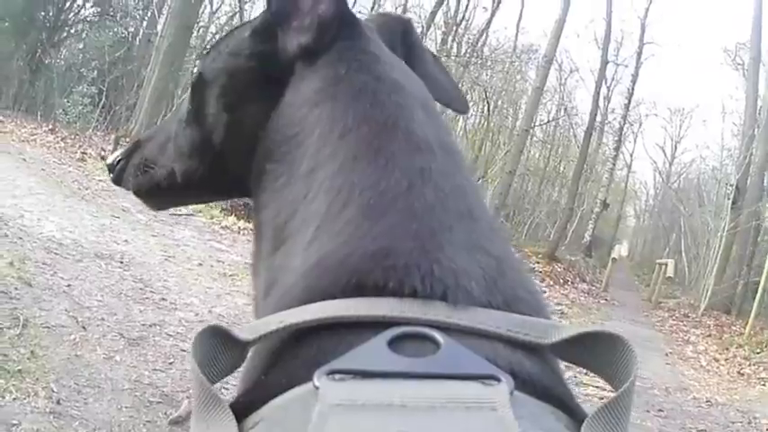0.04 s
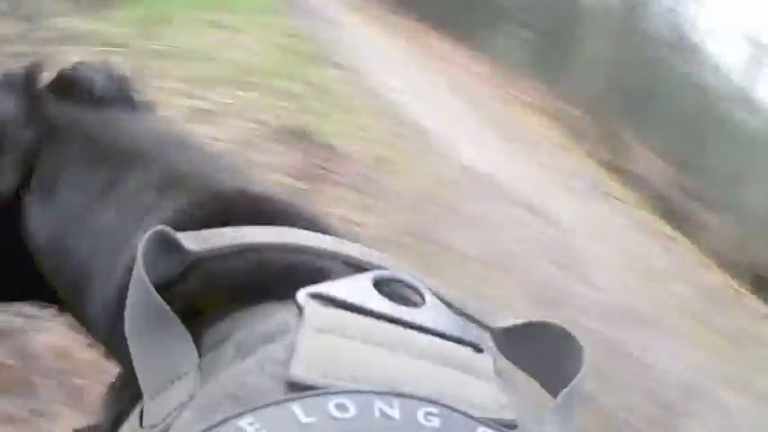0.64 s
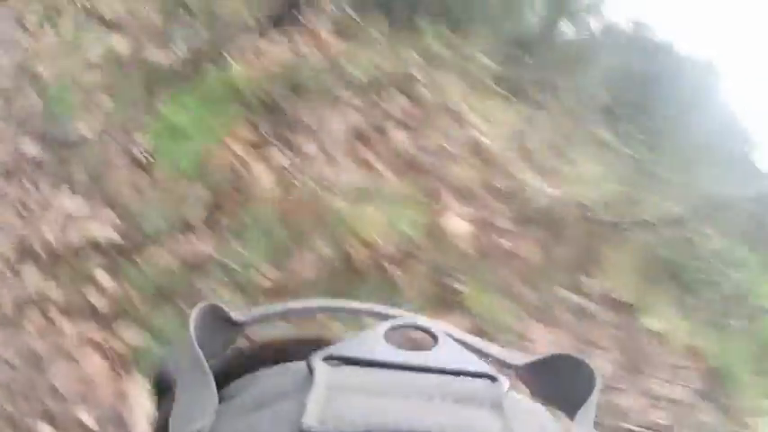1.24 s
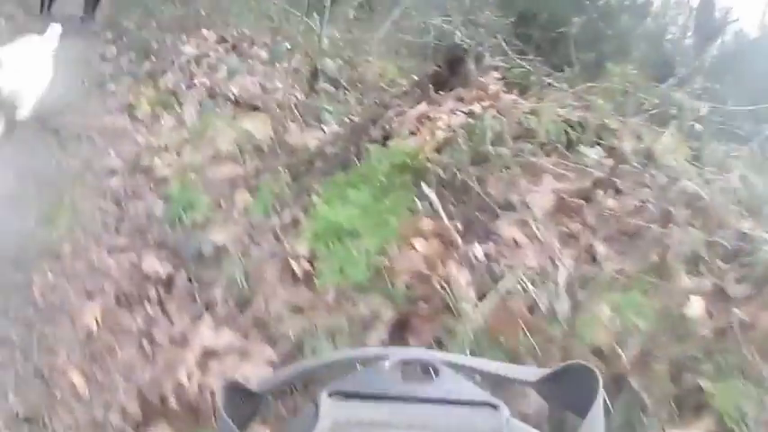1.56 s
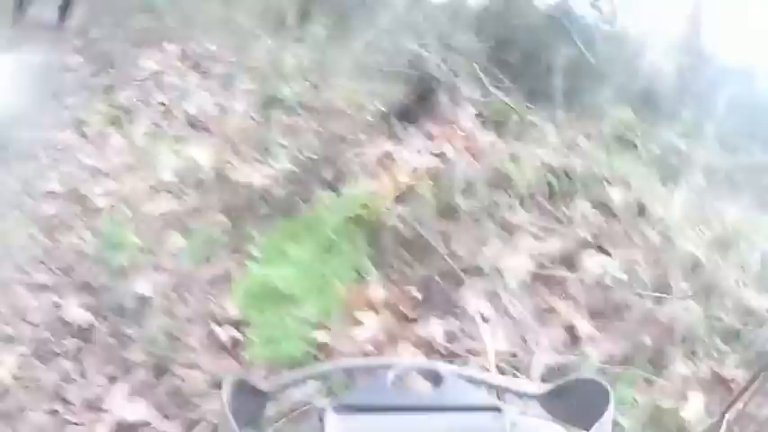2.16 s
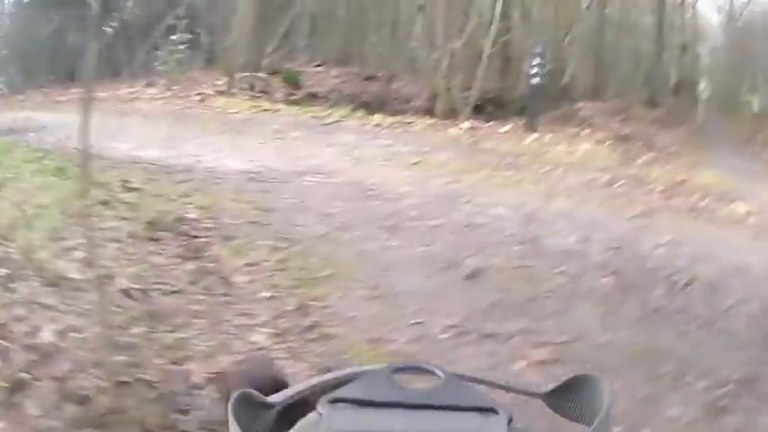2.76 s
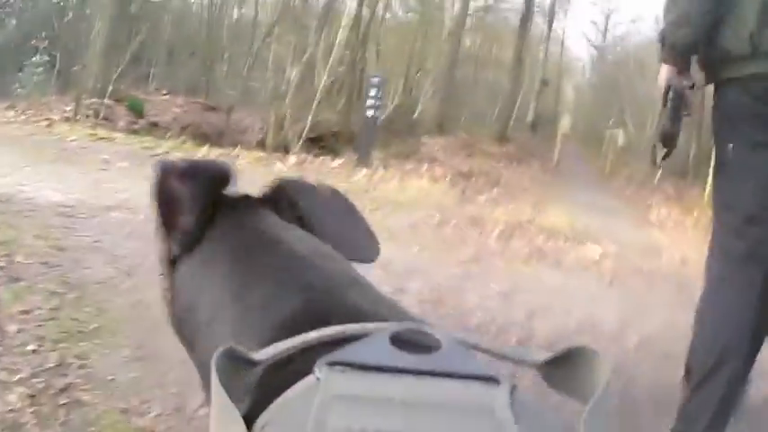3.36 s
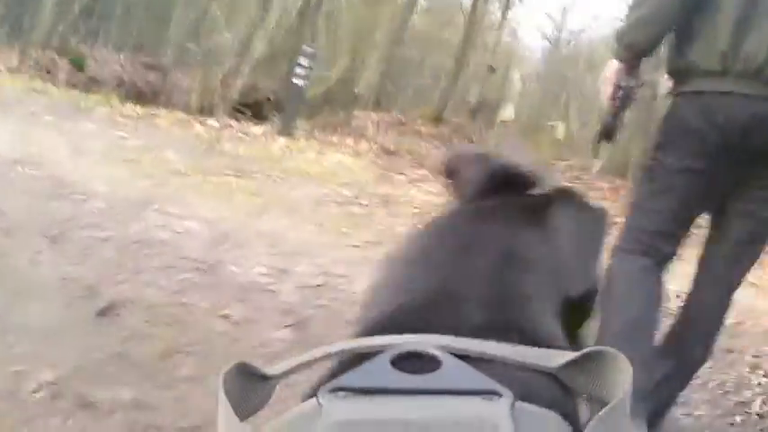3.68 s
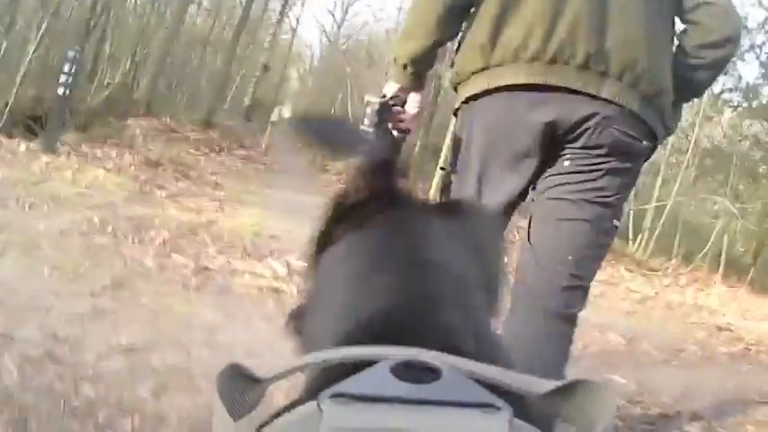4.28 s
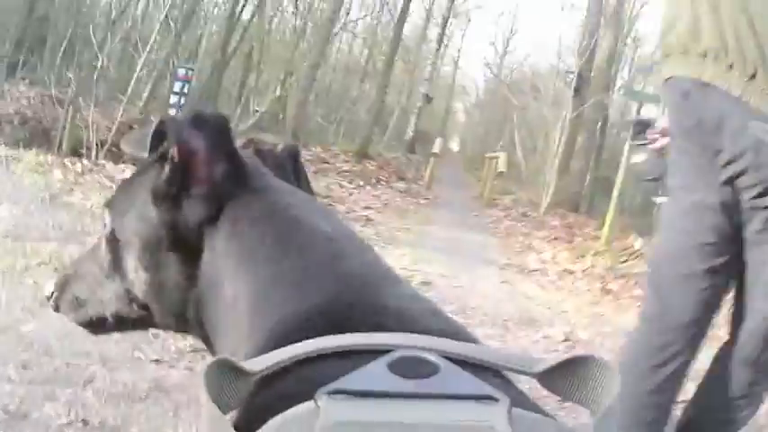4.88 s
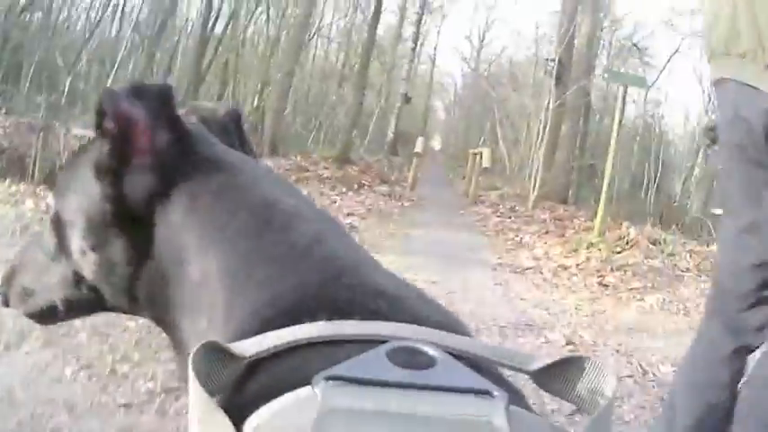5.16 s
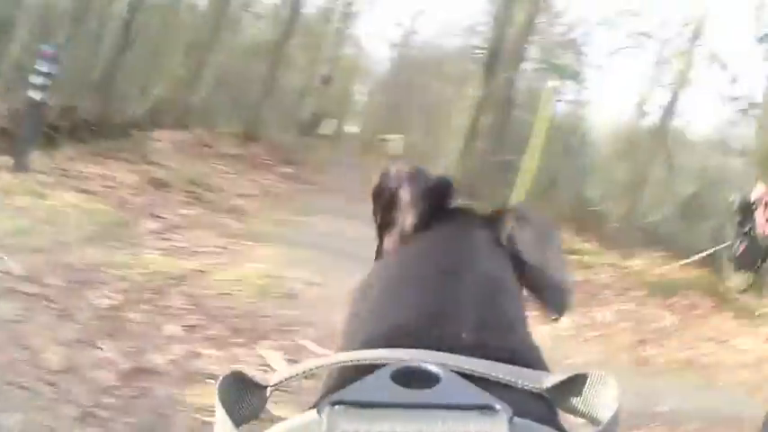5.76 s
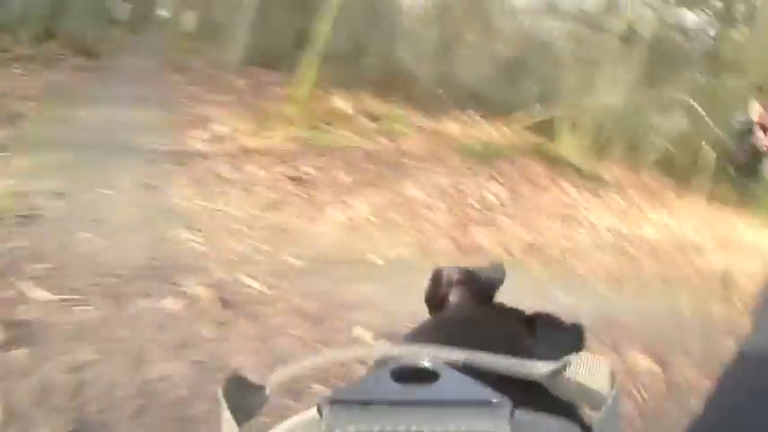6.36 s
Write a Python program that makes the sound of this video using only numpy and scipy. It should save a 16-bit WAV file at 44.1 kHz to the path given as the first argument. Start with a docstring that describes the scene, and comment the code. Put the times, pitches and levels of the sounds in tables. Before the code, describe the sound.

Close handling noise from a camera strapped to a dog moving along a forest path. A low swaying rumble and faint hiss give way to rubbing webbing and one sharp, hard knock of the plastic case. More rattling builds to another loud clatter, after which a thin, faint whine sputters. The harness then keeps bumping softly on the dog's coat, with irregular lighter knocks and strap scrapes.

```python
"""A woodland path, heard from a trotting dog's back: the microphone is in a small plastic-cased camera
on the harness. From the start there is a faint hiss, the camera sways and its pad rumbles on the coat.
The straps begin to rub and creak; at half a second the pad bumps and the loose mount knocks hard,
ringing the case and cracking grit. Near 1.5 s comes another loud clatter, then a faint whine sputters.
Lighter knocks, bumps and scrapes carry on to the end, all right against the microphone."""
import sys
import numpy as np
from scipy import signal
from scipy.fft import rfft, irfft
from scipy.io import wavfile
from scipy.ndimage import uniform_filter1d

SR = 44100
rng = np.random.default_rng(int(sys.argv[2]) if len(sys.argv) > 2 else 0)


def master_out(mix):
    """Clip the mix to full scale and print it as 16-bit PCM to the path in sys.argv[1]."""
    frames = np.transpose(np.atleast_2d(mix))
    ceiling = np.clip(frames, -1, 1)
    pcm = np.round(ceiling * 32767).astype(np.int16)
    wavfile.write(sys.argv[1], SR, pcm)


N = 287532
TIME = np.arange(N) / SR

# colours of the hiss, the camera's sway and the shifting pad: f/Hz, relative level/dB
HISS_SPECTRUM = [(30, 14.5), (300, 11), (1200, -0.5), (3000, -1), (6000, -4), (9000, -3.5), (12000, -4.5),
                 (14000, -8.5), (15500, -16.5)]
SWAY_SPECTRUM = [(5, -18), (13, 2.5), (22, -8), (32, -12.5), (42, -16.5), (56, -18), (90, -47), (200, -86)]
PAD_SPECTRUM = [(35, -24.5), (60, -16), (95, -2.5), (130, 3.5), (175, -8), (240, -17.5), (340, -44),
                (700, -70)]
# ever-present tones of the electronics: f/Hz, level/dB, flutter depth/Hz
IDLE_TONES = [(7280, -84, 25), (9200, -83, 130)]
# rise and fall of the whine: t/s, level/dB
WHINE_LEVELS = [(0, -100), (.8, -82), (1.25, -70.5), (1.7, -74), (2.4, -77.5), (2.55, -78), (3.05, -74),
                (3.9, -82), (4.5, -80), (4.75, -101), (5.3, -91), (5.75, -79), (6.52, -69)]
# tones of the whine: f/Hz, relative level/dB, flutter depth/Hz
WHINE_PARTIALS = [(10149, -2, 25), (11790, -9, 70)]
# how far the dog's back swings the camera: t/s, level before trim/dB
BACK_SWING = [(0.0, -54), (0.54, -38.5), (2.03, -33.5), (2.12, -60.5), (2.18, -33), (2.89, -52.5),
              (2.92, -39), (3.23, -44), (3.3, -36), (3.41, -44), (3.94, -47.5), (3.98, -43), (5.32, -54),
              (5.38, -45), (6.43, -37), (6.52, -58)]
# how hard the dog works its harness, before trims: t/s, strap level/dB, pad level/dB
HARNESS_EFFORT = [(0.0, -84, -65), (0.23, -64.5, -64), (0.38, -57, -56), (0.52, -51.5, -46),
                  (0.72, -60.5, -55), (0.92, -57.5, -51.5), (1.32, -55.5, -44), (1.83, -63, -61),
                  (1.98, -60, -51), (2.8, -62.5, -58.5), (3.03, -56.5, -67), (3.43, -57.5, -51),
                  (4.5, -62, -56), (4.76, -67, -60), (5.39, -64.5, -60.5), (5.68, -60, -47),
                  (5.99, -62.5, -56), (6.28, -55.5, -48), (6.52, -60.5, -52)]
# strides pull the webbing over the mount: t/s, length/s, level/dB, brightness/dB
STRAP_SCRAPES = [(0.397, 0.11, -48, 1), (0.524, 0.072, -40.5, 10.5), (1, 0.052, -49.5, 4),
                 (1.084, 0.14, -49.5, 1.5), (1.251, 0.094, -51, 1), (1.373, 0.1, -46, 3),
                 (1.505, 0.036, -39.5, 1), (1.602, 0.013, -47, 4.5), (1.661, 0.061, -53, 3.5),
                 (1.817, 0.069, -52, 5), (1.915, 0.087, -53, 2.5), (2.743, 0.19, -56.5, 5.5),
                 (2.972, 0.12, -55.5, 1), (3.18, 0.16, -61, 8), (3.47, 0.058, -56, -1),
                 (3.717, 0.068, -56, 0.5), (3.918, 0.12, -53, 2), (4.217, 0.017, -53, 2.5),
                 (4.29, 0.028, -59, -3), (4.521, 0.055, -55, 1.5), (5, 0.045, -57.5, 1),
                 (5.451, 0.043, -59.5, 4), (5.603, 0.12, -51, 1.5), (5.796, 0.025, -73, -7),
                 (6.028, 0.027, -55.5, 5), (6.111, 0.12, -52.5, 4), (6.333, 0.07, -53, 2),
                 (6.444, 0.061, -54, 6)]
# modes of the mount (thud) and the case (bending ring, stiff click): f/Hz, base t60/s, relative level/dB
THUD_MODES = [(148, 0.045, -3.5), (199, 0.022, 0), (287, 0.02, -3.5), (460, 0.014, -0.5),
              (508, 0.038, -4.5), (385, 0.014, -9), (723, 0.016, -3.5)]
BENDING_MODES = [(875, 0.04, -11), (1153, 0.047, 2.5), (1226.4, 0.042, 4), (1502, 0.024, -6),
                 (1770, 0.043, -5.5), (1846, 0.026, -13)]
STIFF_MODES = [(2570, .015, -8), (2690, .017, -1.5), (3010, .011, -8), (3230, .011, -5), (3490, .016, 1),
               (3990, .018, -8), (4930, .012, -17.5), (5150, .012, -19.5), (6250, .01, -20),
               (7200, .01, -27)]
# the padded harness lands on the dog's back: t/s, level/dB, f/Hz of the push
PAD_BUMPS = [(0.415, -42, 143), (0.453, -34, 137), (0.481, -36, 125), (0.521, -25.5, 147),
             (0.585, -38, 130), (1.018, -53, 117), (1.109, -34, 132), (1.259, -34, 143), (1.556, -49, 150),
             (1.611, -39.5, 185), (1.693, -40, 102), (1.948, -45.5, 180), (1.972, -43.5, 153),
             (2.225, -44.5, 140), (2.585, -46, 181), (3.076, -40, 130), (3.26, -41.5, 103),
             (3.299, -39, 130), (3.321, -39, 110), (3.457, -36.5, 128), (3.572, -46.5, 149),
             (3.643, -44.5, 126.5), (3.877, -37, 190), (4.014, -36.5, 131), (4.315, -44, 133),
             (4.71, -49, 136), (4.87, -45.5, 143.5), (5.287, -46, 139), (5.662, -39, 143),
             (5.714, -39.5, 130), (6.132, -42.5, 130), (6.354, -37.5, 134), (6.476, -37.5, 122)]
# the loose mount knocks: t/s, level/dB, relative click level/dB, relative thud level/dB
MOUNT_KNOCKS = [(0.443, -36.5, -17, 2), (0.4473, -40, -2, 5), (0.52, -15, 0.5, -29), (0.5294, -35.5, 0, 8),
                (0.5399, -25, 1.5, -28), (0.5522, -26.5, 2, -9), (0.5548, -27, 0, -16.5),
                (0.571, -31.5, -5, -3), (0.602, -50, 3, -10), (0.6264, -33.5, 4, -20),
                (0.634, -35.5, -7.5, -25), (0.6822, -51, -1, 2.5), (0.8349, -48, -13, -16),
                (0.9582, -33, 4, -8.5), (1.107, -32, 0, -1), (1.1507, -27, 3, -5), (1.264, -39.5, -9, -10),
                (1.349, -40.5, 10.5, -17), (1.3617, -34, -24, -3.5), (1.3934, -42, -4, 5),
                (1.4852, -27.5, 11.5, 8.5), (1.5005, -25, -6.5, 5.5), (1.5226, -42.5, -9, 5),
                (1.5445, -35, -1, 6), (1.6762, -41.5, -3, -4), (1.6995, -42.5, -19, -14),
                (1.722, -42.5, -5.5, -23), (1.7542, -50.5, -6.5, 6.5), (1.801, -45, 0, 2.5),
                (1.8612, -36, -33, 5), (1.8694, -41, -1.5, 4), (2.248, -42, -10, -2),
                (2.346, -44, -10, -10), (2.453, -53, 0.5, -7), (2.744, -55, -2, -7.5), (2.91, -49, -7, -12),
                (3.0069, -36, -15, -1.5), (3.036, -55, -27, 9), (3.08, -58, -28, 5),
                (3.1, -47.5, -9.5, -11), (3.149, -51.5, -8, -25), (3.1856, -50, -9, -24),
                (3.225, -40.5, -8.5, -29), (3.251, -42.5, -8.5, -6), (3.2986, -45.5, -6.5, 1.5),
                (3.4494, -27.5, -20.5, 5.5), (3.4622, -39.5, -6.5, -6), (3.7977, -47.5, -7.5, -1),
                (3.9105, -43.5, -39, 8), (4.0015, -47.5, -9.5, 1), (4.231, -53.5, -5, -3),
                (4.312, -55, -7, 0), (4.3339, -44.5, -9, 2.5), (4.4988, -26.5, -17.5, 2),
                (4.5095, -44, -6.5, -3), (4.5663, -48, -6, 4.5), (4.634, -57, -8, -5), (4.691, -59, -8, -8),
                (4.7788, -51, -10.5, -13.5), (5.0263, -48.5, -11, 4), (5.059, -55, -9.5, -10.5),
                (5.2263, -50, -7.5, -11.5), (5.4306, -55.5, -24, 5), (5.483, -51.5, -4, -3),
                (5.516, -47.5, -22, -10), (5.6044, -39, -21, 0), (5.6173, -46.5, -5, -2),
                (5.656, -46.5, -13, 1), (5.783, -54, -9.5, -4), (5.8123, -51, -1, -1.5),
                (6.034, -46, -2.5, 3.5), (6.113, -52.5, 0, -4), (6.179, -49, -21, 6), (6.2025, -49, 0, 10),
                (6.332, -45, -8, -11), (6.3554, -46, -4, -16), (6.443, -41, -14.5, 6),
                (6.489, -42.5, -8.5, -9)]
# grit in the joint: t/s, level/dB
GRIT_CRACKS = [(0.521, -59.5), (0.53, -62.5), (0.5405, -52.5), (0.5535, -58.5), (0.558, -62.5),
               (0.571, -65), (0.6265, -61), (1.152, -65.5)]
# antiresonances of the case between its groups of modes: f/Hz, width/Hz, depth (0-1)
CASE_NOTCHES = [(2156, 390, 0.7), (3783, 940, 0.7), (4220, 990, 0.95)]

FLUTTER_RATE_HZ = 41.7  # the whine wavers and throbs at this rate


def undb(db):
    """Decibels to gain."""
    return 10 ** (np.asarray(db) / 20)


def unit(x):
    """Scale to rms 1."""
    return x / np.sqrt(np.mean(x ** 2))


def curves(table):
    """The columns of a table, joined by straight lines in time."""
    s, *columns = np.transpose(table)
    return [np.interp(TIME, s, column) for column in columns]


def drift(rate_hz):
    """Smooth random drift of rms 1."""
    step = max(int(SR / rate_hz), 1)
    return unit(uniform_filter1d(np.repeat(rng.standard_normal(N // step + 1), step), step)[:N])


def noise(spectrum):
    """Noise of rms 1 with the given colour."""
    hz, db = np.transpose(spectrum)
    bins_hz = np.arange(N // 2 + 1) * SR / N + 0.011
    gain = undb(np.interp(np.log(bins_hz), np.log(hz), db, left=-120, right=-120))
    return unit(irfft(rfft(rng.standard_normal(N)) * gain, N))


def steady(x, seconds):
    """Even out the slow swells of a sound."""
    return x / np.sqrt(uniform_filter1d(x ** 2, int(seconds * SR)) + 0.0062)


def swells(rows, attack_s, release_s):
    """Attack, hold and release for each (t/s, length/s, level/dB); overlaps add in power."""
    power = np.zeros(N)
    for s, length, db in rows:
        decay = np.maximum(s - TIME, 0) / attack_s + np.maximum(TIME - s - length, 0) / release_s
        near = np.flatnonzero(decay < 10)
        power[near] += (undb(db) * np.exp(-decay[near])) ** 2
    return np.sqrt(power)


def low_pass(x, hz, order=2):
    """Round off a sound above a corner frequency."""
    return signal.sosfilt(signal.butter(order, hz, fs=SR, output="sos"), x)


def band_pass(x, low_hz, high_hz, order=2):
    """Keep one band of a sound."""
    return signal.sosfilt(signal.butter(order, [low_hz, high_hz], "band", fs=SR, output="sos"), x)


def disperse(x, hz, width_hz):
    """Bending waves near one frequency arrive a millisecond or two late (an all-pass)."""
    radius = np.exp(-np.pi * width_hz / SR)
    poles = np.array([1, -2 * radius * np.cos(2 * np.pi * hz / SR), radius ** 2])
    return signal.lfilter(poles[::-1], poles, x)


def ring(modes, pitch=1, damping=0, size=4096):
    """Impulse response of a set of modes; damping (per s) is added to each 1 / t60."""
    t = np.arange(size) / SR
    return sum(undb(db) * np.sin(2 * np.pi * hz * pitch * t) * 1000 ** (-t * (1 / t60 + damping))
               for hz, t60, db in modes)


def strike(force, response, size=441):
    """The ring after a contact, with rms 1 over its first size samples."""
    sound = signal.fftconvolve(force, response)
    return sound / np.sqrt(np.mean(sound[:size] ** 2))


def add(out, s, sound):
    """Mix a sound in at time s."""
    start = int(s * SR)
    out[start:start + len(sound)] += sound[:max(N - start, 0)]


def hiss(effort_db, follow=0.17):
    """A faint background hiss flickers and rises a little with movement."""
    level_db = -67.5 + follow * (effort_db - effort_db.mean())
    flicker_db = 1.1 * (.5 * drift(20) + drift(180))
    return undb(level_db + flicker_db) * noise(HISS_SPECTRUM)


def tone(hz, flutter_hz):
    """A thin electronic tone of rms 1 whose pitch flutters quickly, now more, now less."""
    swing_hz = flutter_hz * (1 + .25 * drift(1.7)) * np.sin(2 * np.pi * FLUTTER_RATE_HZ * TIME)
    return np.sqrt(2) * np.sin(2 * np.pi * np.cumsum(hz + swing_hz) / SR)


def whine(throb_s=0.009, pip_s=0.0025, pip_share=0.9):
    """Faint tones of the electronics: two idle on, two throb and for a while break into short pips."""
    whine_db, = curves(WHINE_LEVELS)
    sputter = swells([(1.62, 0.74, 0)], attack_s=0.092, release_s=0.11)
    from_beat_s = np.sin(np.pi * FLUTTER_RATE_HZ * TIME) / (np.pi * FLUTTER_RATE_HZ)
    sharpness = (1 - sputter) / throb_s + sputter / pip_s
    pips = np.exp(-(from_beat_s * sharpness) ** 2)
    throb = steady(pip_share * pips + 1 - pip_share, seconds=0.096) * undb(1.3 * drift(40))
    partials = sum(undb(whine_db + db) * tone(hz, flutter_hz) for hz, db, flutter_hz in WHINE_PARTIALS)
    idle = sum(undb(db + 2 * drift(120)) * tone(hz + flutter_hz * drift(200), flutter_hz)
               for hz, db, flutter_hz in IDLE_TONES)
    return throb * partials + idle


def rumble(pad_db, scrape, pad_trim_db=-1, drag_db=-2, sway_trim_db=1.5, lurch_db=-5):
    """The pad shifts on the coat, dragged by each scrape; the camera sways, and lurches at each bump."""
    shift = np.hypot(undb(pad_db + pad_trim_db), undb(drag_db) * scrape)
    lumps = unit(undb(1.5 * drift(16)))
    pad = steady(noise(PAD_SPECTRUM), seconds=0.22) * lumps * shift
    swing_db, = curves(BACK_SWING)
    lurch = swells([(s, 0, db + lurch_db) for s, db, _ in PAD_BUMPS], attack_s=0.025, release_s=0.33)
    sway = steady(noise(SWAY_SPECTRUM), seconds=0.22) * np.hypot(undb(swing_db + sway_trim_db), lurch)
    return pad + sway


def jerks(per_s, scatter_db):
    """Random tiny jerks of uneven strength, rms 1."""
    hits = (rng.random(N) < per_s / SR) * rng.choice([-1, 1], N)
    return unit(hits * undb(scatter_db * np.minimum(rng.exponential(size=N), 3)))


def slip(grip):
    """Tiny jerks, the hiss of fibres and a few stronger snags as the webbing slides."""
    force = jerks(per_s=520, scatter_db=4.2) + undb(-12) * rng.standard_normal(N)
    fluttering = unit(force * undb(2 * drift(90)))
    sliding = unit(steady(fluttering, seconds=0.12) * grip)
    return unit(sliding + undb(-3) * jerks(per_s=36, scatter_db=2.5))


def rubbed(force, modes, wander_db=2.5, webbing_t60_s=0.03):
    """Modes damped by the webbing; as the point of contact slides, each one comes and goes."""
    out = np.zeros(N)
    for mode in modes:
        response = ring([mode], damping=1 / webbing_t60_s, size=2048)
        out += undb(wander_db * drift(18)) * signal.oaconvolve(force, response)[:N]
    return unit(out)


def straps(pull, bite):
    """Webbing slips over the mount with a wavering grip; pull drives the low modes, bite the treble."""
    grip = unit(undb(2.5 * drift(35)))
    force = slip(grip)
    fine_force = unit(force + .5 * slip(grip))
    case = disperse(rubbed(force, BENDING_MODES), hz=1260, width_hz=450)
    mount = undb(-3 + 2 * drift(25)) * rubbed(force, THUD_MODES[2:])
    body = low_pass(case + mount, 2050, order=6)
    ticks = disperse(rubbed(fine_force, STIFF_MODES), hz=2870, width_hz=810)
    ticks = band_pass(ticks, 2500, 5600, order=3)
    scratch = unit(band_pass(fine_force, 4850, 5300))
    return pull * body + bite * (undb(-9) * ticks + undb(-21) * scratch)


def bumps(push_s=0.001, settle_s=0.018):
    """The pad lands with a soft push that reaches the mount's lowest modes, then settles unevenly."""
    out = np.zeros(N)
    mount = ring(THUD_MODES)
    t = np.arange(len(mount)) / SR
    for s, db, hz in PAD_BUMPS:
        push = t / push_s * np.exp(-t / push_s)
        settle = unit(low_pass(rng.standard_normal(len(t)), 600)) * np.exp(-t / settle_s)
        force = band_pass(push + undb(-19) * settle, .7 * hz, 1.54 * hz)
        add(out, s, undb(db) * strike(force, mount, size=880))
    return out


def contact(db, chance, size=512):
    """One blow, then tiny rebounds: strong blows seat the joint at once, light ones skitter."""
    skitter = np.clip((-31.5 - db) / 14, 0, 1)
    spread_s = 0.003 + 0.004 * skitter
    chatter = 0.19 + 0.25 * skitter
    lags, strengths = chance
    rebounds = np.clip((lags * spread_s * SR).astype(int), 1, size - 1)
    force = np.zeros(size)
    force[0] = 1
    np.add.at(force, rebounds, chatter * (2 * strengths - 1))
    return force


def click(db):
    """The case's stiff modes; a hard click throws the camera clear of the mount, so they ring longer."""
    freedom = np.clip((db + 27.5) / 11.5, 0, 1)
    response = ring(STIFF_MODES, damping=-freedom / 0.052)
    for hz, width_hz in (2524, 1000), (3220, 540), (4900, 800):
        response = disperse(response, hz, width_hz)
    return band_pass(response, 2500, 5100, order=4)


def crunch(top_db, peak_s=0.00083, size=4096):
    """A brief gritty buzz as the halves of the joint grind together, muffled by the case."""
    age = np.arange(size) / SR / peak_s
    grit = rng.standard_normal(size)
    muffled = band_pass(grit, 4600, 6400, order=3) + undb(top_db) * band_pass(grit, 6500, 11000)
    return unit(muffled * age * np.exp(-age))


def knocks():
    """Every knock rings the mount and the case; hard ones click, cushioned ones sound low and hollow."""
    out = np.zeros(N)
    mount = disperse(ring(THUD_MODES), hz=300, width_hz=328)
    chances = rng.random((len(MOUNT_KNOCKS), 2, 8))  # lag and strength of eight rebounds each
    for (s, db, click_db, thud_db), chance in zip(MOUNT_KNOCKS, chances):
        force = contact(db, chance)
        cushion = np.clip(-click_db / 18, 0, 1)
        pitch = 1 - 0.046 * cushion  # the pad loads the case
        case = ring(BENDING_MODES, pitch, damping=15)
        case = disperse(case, hz=1220 * pitch, width_hz=460 - 160 * cushion)
        # a cushioned contact lasts longer, leaving the upper bending modes quiet
        corner_hz = np.clip(3200 * 2 ** (click_db / 15), 1100, 3500)
        body = strike(low_pass(force, corner_hz, order=3), case)
        thud = strike(low_pass(force, 900), mount)
        snap = strike(force, click(db + click_db)) + undb(-27) * strike(force, crunch(top_db=-22.5))
        add(out, s, undb(db) * (body + undb(thud_db) * thud + undb(click_db) * snap))
    return out


def cracks():
    """Grit in the joint cracks brightly under some of the hardest blows."""
    out = np.zeros(N)
    for s, db in GRIT_CRACKS:
        add(out, s, undb(db) * crunch(top_db=-14))
    return out


def through_case(x):
    """On the way to the microphone the case cancels a few bands."""
    for hz, width_hz, depth in CASE_NOTCHES:
        x = x - depth * band_pass(x, hz - width_hz / 2, hz + width_hz / 2, order=1)
    return x


def scene():
    """Mono, on the dog's back: handling noise comes through the case, over rumble, whine and hiss."""
    rub_db, pad_db = curves(HARNESS_EFFORT)
    rub = undb(rub_db - 0.5)
    edges = dict(attack_s=0.0092, release_s=0.0023)
    scrape = swells([(s, length, db) for s, length, db, _ in STRAP_SCRAPES], **edges)
    bite = swells([(s, length, db + bright) for s, length, db, bright in STRAP_SCRAPES], **edges)
    handling = knocks() + cracks() + bumps() + straps(np.hypot(rub, scrape), np.hypot(rub, bite))
    return (through_case(handling) + rumble(pad_db, scrape) + whine() + hiss(rub_db))[None]


def record(dry):
    """The camera's microphone rounds the hardest knock; the top is cut."""
    ceiling, top_hz = 0.92, 14900
    rounded = ceiling * np.tanh(dry / ceiling)
    return signal.sosfilt(signal.ellip(8, .2, 70, top_hz, fs=SR, output="sos"), rounded)


dry = scene()
out = record(dry)
master_out(out)
```